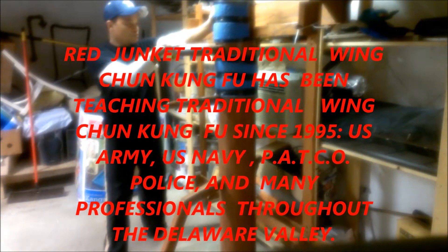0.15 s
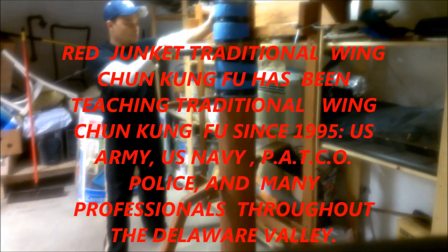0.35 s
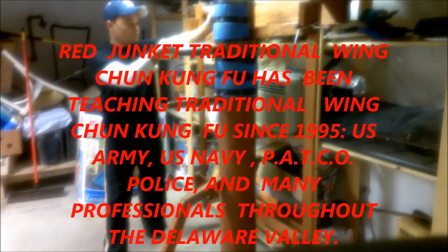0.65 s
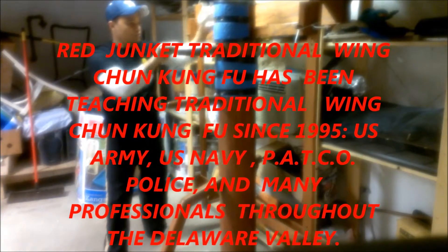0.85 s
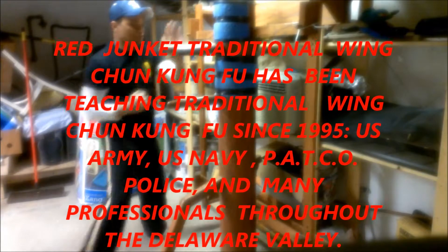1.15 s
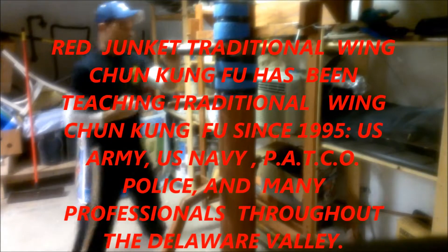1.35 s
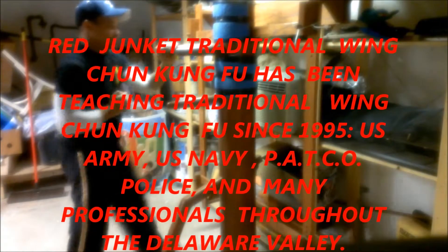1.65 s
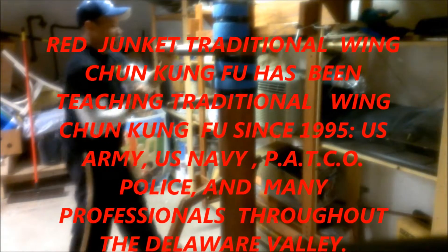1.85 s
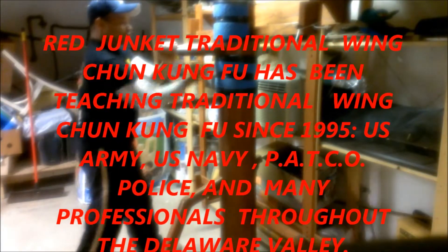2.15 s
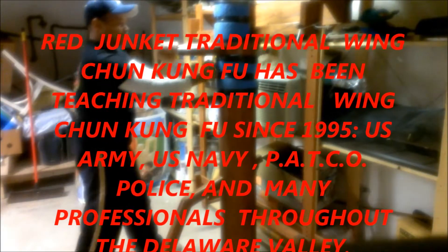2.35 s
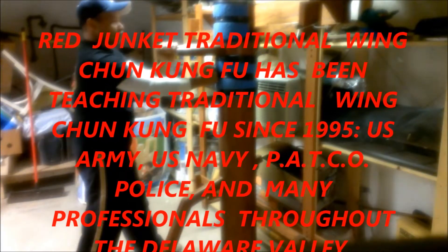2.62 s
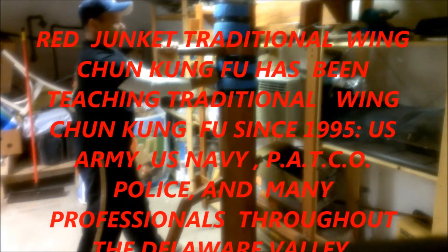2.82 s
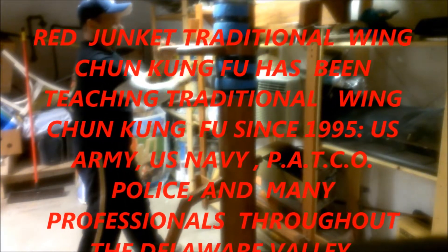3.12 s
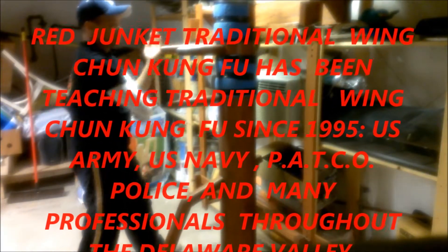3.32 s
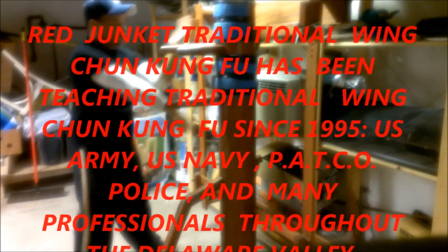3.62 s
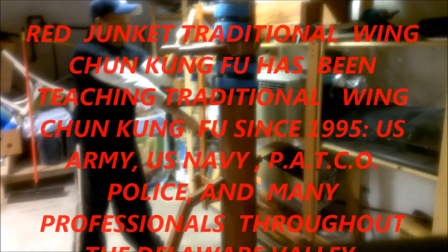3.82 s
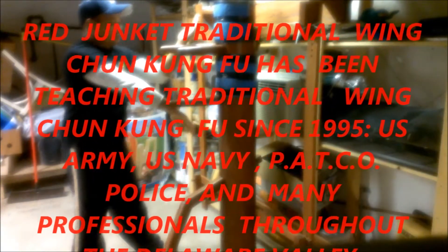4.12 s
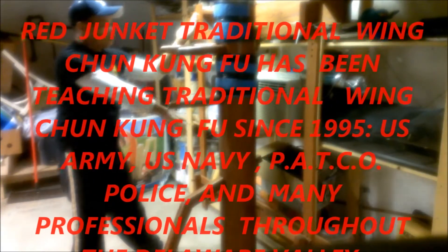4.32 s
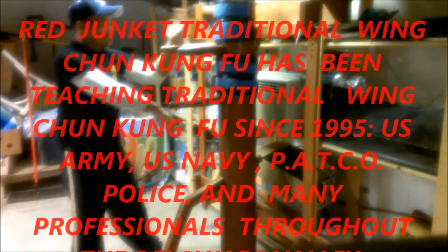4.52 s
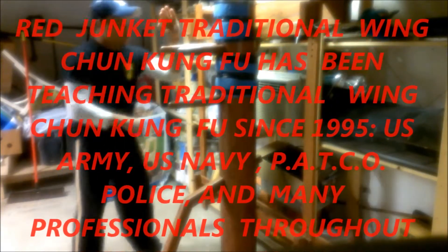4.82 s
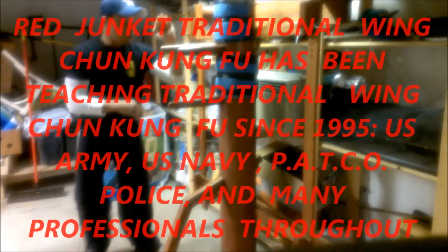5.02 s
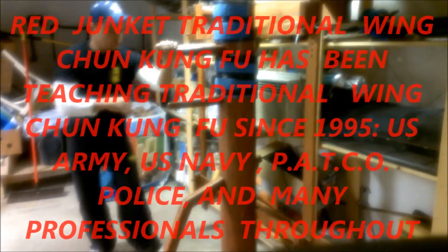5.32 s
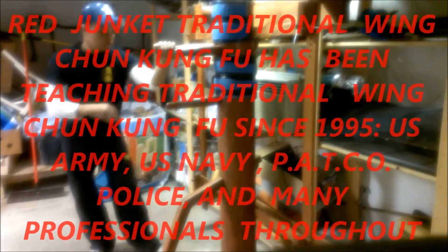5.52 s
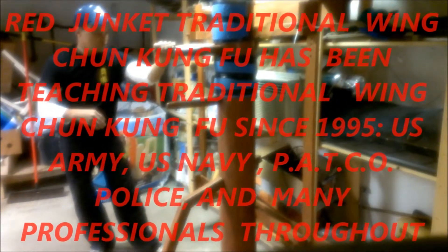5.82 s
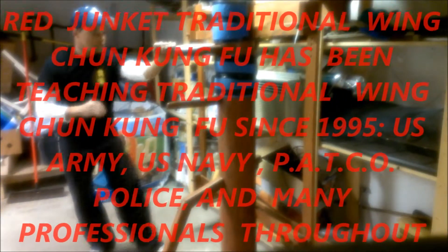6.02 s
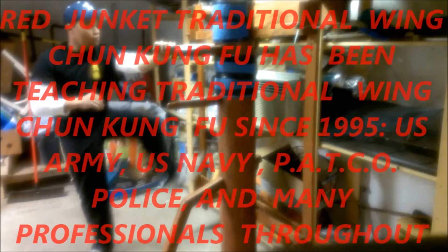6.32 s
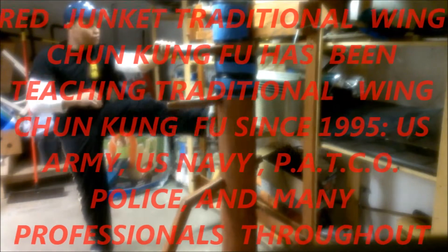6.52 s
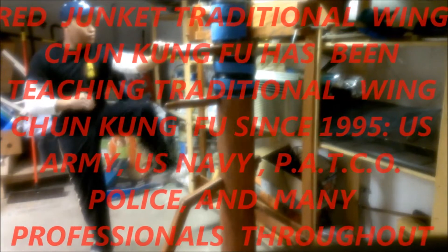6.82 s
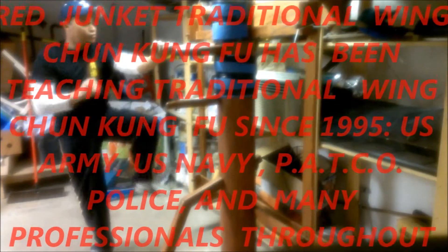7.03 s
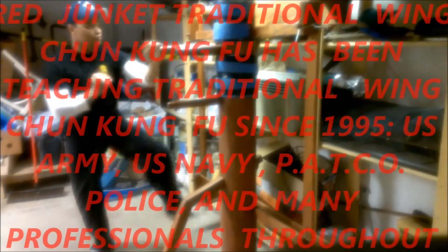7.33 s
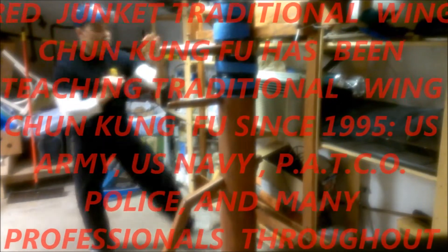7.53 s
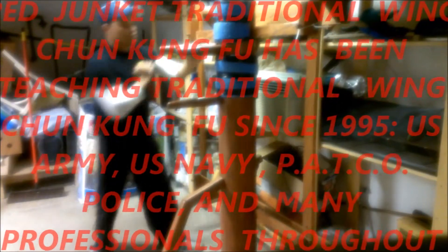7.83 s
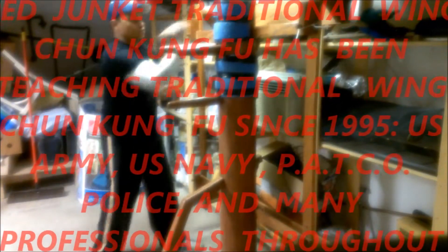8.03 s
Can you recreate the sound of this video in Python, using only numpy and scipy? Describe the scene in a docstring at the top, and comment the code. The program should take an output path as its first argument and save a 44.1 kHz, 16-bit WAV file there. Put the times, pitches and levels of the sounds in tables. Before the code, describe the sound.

A person strikes a wooden training dummy in a small workshop, slightly left of the microphone, with short reflections and a faint hiss. After a near-quiet start with a soft rustle, a loud wooden crack at 1.3 seconds sets the loose arms rattling. A quick run of clacks follows around 2.4. Another loud knock lands at 3.8 and shakes the frame, then lighter clattering hits come near 4.4 and between 5.3 and 5.7. After a knock at 6.2, a kick brings a longer swell of juddering wood and scuffing from about 6.4 to 7. Duller knocks follow near 7.5, a sharp ringing clack at 7.9 and a lighter tap just after 8. The post thuds dully beneath the blows, sleeves and soles scuff with each move, and the wood creaks faintly in the pauses.

```python
"""A cluttered workshop, where forearms, palms and a foot strike the arms of a wooden training dummy.
Each blow cracks and sets the wood ringing; the loose arms chatter in their sockets, the frame judders
and the post thuds in its stand. Sleeves and soles scuff in grainy swells. Between the moves the wood
creaks and stirs. Short reflections surround it all, and a faint room hiss lies below."""
import sys
import numpy as np
from scipy import signal
from scipy.fft import rfft, irfft, next_fast_len
from scipy.io import wavfile

SR = 44100
rng = np.random.default_rng(int(sys.argv[2]) if len(sys.argv) > 2 else 0)


def transcribe(u):
    """Save the signal u as a 16-bit wav file named by the first command-line argument.

    u: samples, shape (n,) or (channels, n), limited to [-1, 1]; the rate is SR.
    q: integer samples, one column per channel.
    """
    v = np.clip(np.atleast_2d(u).T, -1, 1)
    q = np.round(v * 32767).astype(np.int16)
    wavfile.write(sys.argv[1], SR, q)


N = 359847

# modes of the dummy's frame and arms: f/Hz, level/dB, t60/s
DUMMY_MODES = [(340, -5, .05), (400, -2, .06), (465, -3, .07), (555, -2, .07), (745, 0, .09), (860, 1, .09),
               (990, -2, .07), (1150, -7, .06), (1330, -5, .05), (1720, 0, .09), (2040, -2, .05),
               (2600, -1, .07), (2950, -4, .04), (3320, -4, .04), (4400, -5, .04), (4980, -2, .1),
               (5350, -3, .07), (5900, -4, .04), (6450, -2, .05), (620, -3, .45), (1490, -3, .13),
               (2400, -2, .12), (3700, -1, .16), (3960, 0, .3), (4080, -3, .16), (4750, 0, .13)]
ARMS_FROM_HZ = 1250   # modes above this belong to the arms
# faint stirring between the moves: t/s, wood level/dB, cloth level/dB
STIRRING = [(0, -69, -69), (.1, -92, -100), (.5, -92, -103), (.64, -74.5, -98), (.85, -69.5, -74),
            (1.24, -62.5, -65.5), (1.3, -74, -73), (1.6, -64, -62), (1.85, -59, -64), (1.999, -84.5, -79),
            (2.25, -71.5, -85), (2.662, -61.5, -70.5), (3.08, -76.5, -80), (3.2, -68, -68.5),
            (3.432, -79.5, -79), (3.699, -80, -75), (4.3, -60.5, -65), (4.6, -69, -78), (4.87, -80, -85.5),
            (5.1, -76.5, -73), (5.77, -61, -64.5), (6.05, -75.5, -77), (6.35, -58, -58.5),
            (7.02, -55.5, -62.5), (7.28, -67.5, -68.5), (7.63, -60.5, -66.5), (7.74, -65, -71),
            (7.86, -57, -60), (8.08, -74, -68)]


def blows():
    """Each blow: a short crack, then a dying burst of chatter into the modes near where it lands."""
    # t/s, knock level/dB, knock f/Hz, clack level/dB, clack f/Hz, clack spread/octaves,
    # crack level/dB, chatter decay/s, share of free ring (0-1)
    strikes = [(1.312, -50, 850, -1, 6570, 0.1, -42, 0.0095, 0.16),
               (1.315, -21, 920, -14, 2430, 1.1, -21, 0.006, 0.27),
               (1.326, 3, 940, -42, 2480, 0.47, -35, 0.014, 0.08),
               (2.276, -74, 793, -44, 6030, 0.33, -48, .02, 0.2),
               (2.376, -33, 800, -11, 2980, 1.5, -10, 0.0029, 0.01),
               (2.471, -24, 800, -20, 3500, 1.2, -21, .004, .12),
               (3.113, -77.5, 800, -39.5, 6480, 0.23, -56, 0.0045, 0.4),
               (3.776, 3, 946, -31, 4530, 0.57, -51, 0.03, 0.19),
               (3.811, -38, 784, -2.5, 2440, 0.75, -26, 0.02, 0),
               (4.214, -74, 800, -32, 6100, 0.31, -55, 0.01, 0.14),
               (4.354, -13, 810, -18, 1820, 0.36, -55, 0.046, 0.5),
               (4.405, -18, 714, -24, 2460, 0.12, -36, 0.018, 0.38),
               (4.406, -60, 750, -26, 3730, 0.088, -62, 0.017, 0.17),
               (4.407, -60, 750, -32.5, 4750, .06, -62, 0.024, .35),
               (4.442, -60, 750, -28, 3750, .1, -62, .015, .25),
               (4.445, -60, 750, -24, 2450, .1, -62, .018, .35),
               (4.427, -22, 694, -21.5, 1510, 0.22, -60, 0.018, 0.4),
               (4.48, -34, 620, -40, 1500, .2, -73, .008, 1),
               (5.347, -19, 750, -19.5, 2180, 0.66, -36, 0.011, 0.21),
               (5.4, -40, 600, -17, 2600, 0.1, -50, 0.0073, 0.2),
               (5.57, -14, 560, -42, 2600, .3, -50, 0.014, 0.14),
               (5.478, -40, 800, -22, 2550, .1, -50, .008, .5),
               (5.509, -40, 800, -21, 2550, .1, -50, .008, .5),
               (5.597, -40, 560, -19, 2600, .08, -44, .006, .5),
               (5.545, -40, 600, -21, 3700, .06, -38, .015, .2),
               (5.62, -35, 600, -20, 3700, .06, -40, .005, .2),
               (5.655, -40, 600, -21, 3700, .06, -45, .01, .2),
               (6.212, -21.5, 606, -59, 2500, 0.36, -44, 0.015, 0.1),
               (6.637, -25, 700, -13, 3970, 0.57, -30, 0.044, 0.06),
               (6.647, -45, 700, -19, 5350, .06, -50, 0.033, 0.4),
               (6.84, -20.5, 627, -38, 2100, 0.77, -43, 0.019, 0.14),
               (7.438, -22, 700, -57, 1500, .4, -60, 0.014, 0.54),
               (7.503, -9.5, 533, -28, 1600, 0.28, -49, 0.0065, 0.27),
               (7.75, -44, 895, -37, 4630, 0.42, -50, 0.041, 0.14),
               (7.884, -18.5, 790, -21.5, 4020, 0.085, -16.5, 0.038, 0.47),
               (7.886, -48, 800, -42, 5030, .06, -50, .03, .5),
               (8.088, -28, 750, -53, 3000, 0.72, -50, 0.038, 0.24)]
    frame_contacts, arm_contacts = grains(2500, 1.6, 0.92), grains(4000, 1.4, 0.28)
    crack = butter_filter(grains(21000, 1.1, 0.43), 2, [1400, 7500], "band")
    out = np.zeros((2, N))
    for start, knock_db, knock_hz, clack_db, clack_hz, clack_octaves, crack_db, decay_s, free in strikes:
        at = round(start * SR)
        span = slice(at, min(at + SR // 2, N))
        age = np.arange(span.stop - at) / SR
        out[:, span] += from_db(crack_db) * crack[:, span] * np.exp(-age / 0.0017)
        dying = np.exp(-age / decay_s) / np.sqrt(decay_s * SR)
        for k, (hz, mode_db, t60) in enumerate(DUMMY_MODES):
            if hz < ARMS_FROM_HZ:
                contacts, hit_db, centre_hz, octaves = frame_contacts, knock_db, knock_hz, 0.4
                weight = 1
            else:
                contacts, hit_db, centre_hz, octaves = arm_contacts, clack_db, clack_hz, clack_octaves
                weight = min(t60 / 0.1, 1) ** (2.5 * free)   # a free arm favours its clear modes
            nearness = np.exp(-(np.log2(hz / centre_hz) / octaves) ** 2)
            gain = from_db(hit_db + mode_db) * nearness * weight
            if gain < from_db(-85):   # too faint to hear
                continue
            chatter = np.roll(contacts[:, span], 499 * k, axis=1) * dying
            out[:, span] += gain * ring(chatter, hz, t60 * max(free, 0.05))
    return out


def shaking_dummy():
    """Frame judder, post thud and arm chatter: three rattles that swell as the dummy is shaken."""
    # t/s, rise/s, hold/s, sag/(dB/s), frame level/dB, post level/dB, arm level/dB
    shakes = [(0.921, 0.051, 0.012, 0, -50.5, -65, -58), (1.311, .012, 0.22, 76.5, -20.5, -40, -22),
              (1.646, .012, 0.074, -66, -46, -56, -52), (2.277, 0.065, 0.057, 0, -38, -40.5, -44.5),
              (2.356, 0.022, 0.087, 92, -22.5, -38, -24.5), (2.468, .006, 0.077, 61, -27.5, -39, -29.5),
              (3.212, 0.01, .045, 99.5, -61, -34, -68), (3.517, 0.037, 0.097, 1.5, -65.5, -66.5, -73),
              (3.766, 0.005, 0.23, 109, -16, -37, -14), (3.924, 0.019, 0.19, 120, -30.5, -46, -32.5),
              (4.015, 0.033, 0.033, 5, -58, -38.5, -47.5), (4.178, .005, 0.051, 7, -65, -64, -61.5),
              (4.216, 0.022, 0.024, 7, -54, -58, -62), (4.346, 0.0088, 0.085, -6, -33.5, -44, -51.5),
              (4.64, 0.054, .01, 7, -65, -74.5, -63), (5.231, 0.014, 0.043, 54, -68.5, -56.5, -80),
              (5.342, 0.014, 0.17, 30, -26, -37, -32), (5.529, 0.019, 0.14, 3, -31, -44.5, -36),
              (6.058, .008, .1, -24, -58.5, -76, -65.5), (6.187, .012, 0.047, 195, -32, -45.5, -42.5),
              (6.446, 0.11, 0.25, 46, -27.5, -44.5, -33.5), (6.825, .005, 0.081, 2, -33.5, -59, -40),
              (6.86, 0.05, 0.011, 5, -51, -44, -31.5), (6.947, 0.025, 0.012, 10, -47, -67, -40.5),
              (7.285, 0.012, .17, -22.5, -46, -55.5, -47.5), (7.426, 0.015, 0.038, 10, -35, -43, -46),
              (7.5, 0.017, 0.015, 3, -33, -53, -48.5), (7.742, .008, 0.013, 8, -41.5, -47.5, -47.5),
              (7.877, 0.013, .07, 138, -34.5, -48, -30.5), (8.09, 0.019, 0.064, 105, -38, -49, -43)]
    # modes of the post in its stand: f/Hz, level/dB, t60/s
    post_modes = [(126, -7.5, 0.072), (146, 0.5, 0.033), (197, -1.5, 0.15), (245, 1.5, 0.02),
                  (301, -1, 0.033)]
    frame_modes = [mode for mode in DUMMY_MODES if mode[0] < ARMS_FROM_HZ]
    arm_modes = [mode for mode in DUMMY_MODES if mode[0] > ARMS_FROM_HZ]
    t = np.arange(N) / SR
    stir_times, wood_db, _ = np.transpose(STIRRING)
    flicker_db = 0.5 * np.interp(22 * t, np.arange(400), rng.standard_normal(400))   # 22 steps a second
    bed_db = np.interp(t, stir_times, wood_db) + flicker_db
    *timing, sag, frame_tops, post_tops, arm_tops = np.transpose(shakes)
    # the heavy post keeps going, the light arms settle sooner
    frame_db = swells(timing, 0.93 * sag, frame_tops, bed_db, release_db_per_s=280)
    post_db = swells(timing, 0.21 * sag, post_tops, bed_db - 0.7, release_db_per_s=280)
    arm_db = swells(timing, 1.194 * sag, arm_tops, bed_db - 8, release_db_per_s=390)
    frame = rattle(frame_db, frame_modes, grains(1800, 1.6, 0.86), held_t60=0.011)
    post = rattle(post_db, post_modes, grains(500, 4.5, 0.95), held_t60=0.079)
    arms = rattle(arm_db, arm_modes, grains(3500, 3.4, 0.33), held_t60=0.0051)
    return frame, post, arms


def rattle(level_db, modes, contacts, held_t60):
    """Dense contacts, shifted for each mode; the limb resting on the wood damps all modes alike."""
    gain = from_db(level_db)
    out, steady = np.zeros((2, N)), np.zeros(SR)
    for shift, (hz, mode_db, _) in zip(rng.integers(0, N, len(modes)), modes):
        push = np.roll(contacts, shift, axis=1)
        out += from_db(mode_db) * ring(push * gain, hz, held_t60)
        steady += from_db(mode_db) * ring(push[0, :SR], hz, held_t60)
    return out / np.std(steady)   # so that level_db sets the rms


def scuffs():
    """Sleeves and soles rub: fine friction grains, with the top end swelling at its own level."""
    # t/s, rise/s, hold/s, sag/(dB/s), level/dB, brightness/dB
    rubs = [(0.896, .006, .02, 100, -60.5, -5), (0.925, 0.045, 0.03, 5, -49.5, -2),
            (1.089, 0.037, .02, 5, -56.5, -9), (1.302, 0.0068, 0.0093, 5, -35.5, -6),
            (1.327, 0.047, 0.18, 130, -29.5, -5), (1.497, 0.044, 0.035, 5, -38, -7),
            (1.639, 0.01, 0.086, 15, -43, -5), (2.272, 0.061, 0.026, 201, -35, -4.5),
            (2.36, 0.017, .07, 80.5, -37, -24), (2.469, .006, 0.11, 103, -37.5, -17),
            (2.66, .03, 0.027, 5, -63.5, 6), (3.11, .003, 0.016, 403, -56.5, 6),
            (3.219, .005, 0.077, 11, -67.5, 11), (3.522, 0.026, .1, 34.5, -68, 11.5),
            (3.769, 0.0073, 0.018, 498, -16, -33), (3.787, 0.019, 0.17, 48, -29, -14),
            (3.927, 0.012, 0.3, 155, -29, -5.5), (4.182, .004, .02, 5, -57, 4),
            (4.208, .008, .015, 5, -51.5, -3), (4.339, .008, .03, 300, -52.5, -6),
            (4.62, 0.031, 0.046, -8, -63.5, -2.5), (5.245, .012, .09, 6.5, -69.5, 7.5),
            (5.34, .01, 0.27, 56, -35, -4.5), (5.524, 0.029, 0.019, 5, -32, -3),
            (5.579, 0.047, 0.068, 180, -27.5, -4), (6.065, 0.0053, 0.084, 34, -53.5, 0),
            (6.182, 0.0051, 0.069, -80, -48, -4), (6.424, 0.13, .24, 105, -27, -1.5),
            (6.821, 0.032, 0.081, 11, -33.5, -5), (6.948, .02, 0.021, 5, -43, -5),
            (7.026, 0.025, 0.055, 5, -54, -14), (7.133, 0.025, .04, 11, -60.5, -9),
            (7.285, 0.015, 0.19, 7, -38.5, -7.5), (7.376, 0.011, 0.01, 5, -35, -7),
            (7.744, 0.0077, 0.03, 5, -45, -2.5), (7.879, 0.003, .08, 192, -32.5, -3.5),
            (8.084, 0.019, 0.03, 21, -35, -3)]
    # tone of the friction: f/Hz, level/dB
    spectrum = [(530, -39), (900, -19.5), (1220, -11), (2660, -8), (3860, -5.5), (4460, -3), (6180, 3),
                (10000, -9.5), (12100, -12.5), (16000, -18)]
    stir_times, _, cloth_db = np.transpose(STIRRING)
    bed_db = np.interp(np.arange(N) / SR, stir_times, cloth_db)
    *timing, sag, tops, brightness = np.transpose(rubs)
    dull_db = swells(timing, sag, tops, bed_db, release_db_per_s=448)
    bright_db = swells(timing, sag, tops + brightness, bed_db + 8, release_db_per_s=448)
    dull, bright = split(coloured(grains(9000, 3.7, 0.48), spectrum), hz=10000)
    return from_db(dull_db) * dull + from_db(bright_db) * bright


def creaks(width_hz=40):
    """Wood creaks faintly on wood: noise through one narrow resonance under a rounded swell."""
    # t/s, length/s, f/Hz, level/dB
    slips = [(0.445, 0.19, 1020, -76), (0.902, 0.032, 740, -68), (2.167, 0.074, 1006, -77),
             (2.759, .04, 456, -58), (3.154, 0.048, 434, -60), (3.542, 0.12, 980, -73.5),
             (4.242, 0.064, 730, -49.5), (4.92, .05, 460, -68.5), (5.13, 0.13, 1090, -72.5),
             (5.262, 0.041, 1094, -73.5), (5.856, 0.11, 340, -63.5), (7.094, 0.094, 660, -58)]
    out = np.zeros(N)
    for start, length, hz, db in slips:
        at, size = round(start * SR), round(length * SR)
        tone = rms_one(ring(rng.standard_normal(SR // 4), hz, t60=2.2 / width_hz))
        out[at:at + size] = from_db(db) * np.hanning(size) * tone[-size:]
    return out


def workshop_reflections(sound, t60=0.19, alike_below_hz=690):
    """Dense, fast-dying reflections, mono in the bass and wide above."""
    age = np.arange(SR // 2) / SR
    tails = rng.standard_normal((3, len(age))) * from_db(-60 * age / t60) * (age > 0.004)
    tails /= np.sqrt(np.sum(tails[2] ** 2))
    bass, _ = split(tails[2], alike_below_hz)
    _, treble = split(tails[:2], alike_below_hz)
    response = from_db(-5) * bass + from_db(-8) * treble
    return signal.fftconvolve(sound.mean(0)[None], response, axes=1)[:, :N]


def room_hiss():
    """Steady, faint noise whose low end is partly shared by left and right."""
    # tone of the hiss: f/Hz, level/dB
    spectrum = [(12, -32), (20, -2), (27, -20.5), (101, -19), (120, -25.5), (210, -16), (902, -25),
                (1010, -22.5), (1160, -24.5), (2090, -25), (6060, -27.5), (12900, -26), (16100, -26.5)]
    shared, _ = split(rng.standard_normal(N), hz=800)
    return from_db(-65) * coloured(0.76 * shared + rng.standard_normal((2, N)), spectrum)


def grains(per_s, uneven_db, alike):
    """Random contacts of uneven size and either sign; alike (0-1) narrows the stereo image; rms 1."""
    sizes = from_db(uneven_db * np.minimum(rng.exponential(1, (2, N)), 4))
    signs = rng.choice([-1, 1], (2, N))
    mid, side = rms_one(sizes * signs * (rng.random((2, N)) < per_s / SR))
    return (np.sqrt(1 + alike) * mid + np.sqrt(1 - alike) * side * [[1], [-1]]) / np.sqrt(2)


def swells(timing, sags, tops_db, bed_db, release_db_per_s, rise_db=31.5):
    """Envelope in dB: swells rise, sag while held and let go, their powers added to a bed."""
    power = from_db(2 * bed_db)
    for start, rise, hold, sag, top_db in zip(*timing, sags, tops_db):
        at = round(start * SR)
        age = np.arange(min(SR, N - at)) / SR
        level_db = top_db - rise_db * np.clip(1 - age / rise, 0, 1)
        level_db -= sag * np.clip(age - rise, 0, hold)
        level_db -= release_db_per_s * np.maximum(age - rise - hold, 0)
        power[at:at + len(age)] += from_db(2 * level_db)
    return 10 * np.log10(power)


def ring(push, hz, t60):
    """One mode: a unit click sets off a dying sine of height 1."""
    radius, angle = from_db(-60 / (t60 * SR)), 2 * np.pi * hz / SR
    return signal.lfilter([0, np.sin(angle)], [1, -2 * radius * np.cos(angle), radius ** 2], push + 1e-18)


def coloured(x, spectrum):
    """Equalised by (Hz, dB) points joined on a log axis; rms 1."""
    size = next_fast_len(N)
    hz, level_db = np.transpose(spectrum)
    log_hz = np.log(np.maximum(np.arange(size // 2 + 1) * SR / size, 1))
    gain = from_db(np.interp(log_hz, np.log(hz), level_db))
    return rms_one(irfft(rfft(x, size) * gain, size)[..., :N])


def split(x, hz):
    """Parts below and above a frequency; they add up to the whole."""
    low = signal.sosfiltfilt(signal.butter(2, hz, fs=SR, output="sos"), x)
    return low, x - low


def butter_filter(x, order, hz, kind):
    """Filter with a flat passband."""
    return signal.sosfilt(signal.butter(order, hz, kind, fs=SR, output="sos"), x)


def from_db(db):
    """Gain of a level in dB."""
    return 10 ** (np.asarray(db) / 20)


def rms_one(x):
    """Scaled to rms 1."""
    return x / np.sqrt(np.mean(x ** 2) + 1e-20)


def scene():
    """Dummy and scuffs a little to the left, the room around them, hiss below."""
    frame, post, arms = shaking_dummy()
    # wood radiates little bass, and soft contacts little top
    wood = butter_filter(frame + arms + blows(), 3, [358, 9100], "band")
    direct = wood + post + scuffs() + creaks()
    bass, treble = split(direct + workshop_reflections(direct), hz=800)
    # the microphone's far side is shaded in the treble, and little bass reaches either side
    placed = bass * from_db([[0.2], [-0.2]]) + treble * from_db([[1.8], [-1.8]])
    return butter_filter(placed, 6, 105, "high") + room_hiss()


def record(dry):
    """Peaks are slightly rounded, the top is cut steeply."""
    rounded = 0.46 * np.tanh(dry / 0.71)
    return signal.sosfilt(signal.cheby2(18, 60, 16200, fs=SR, output="sos"), rounded)


dry = scene()
out = record(dry)
transcribe(out)
```